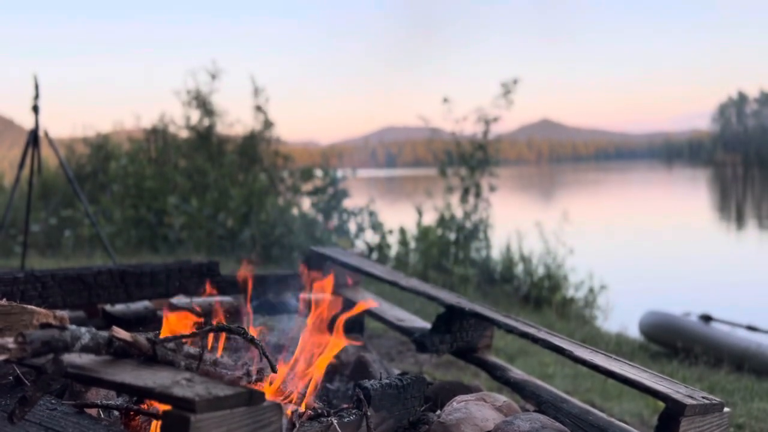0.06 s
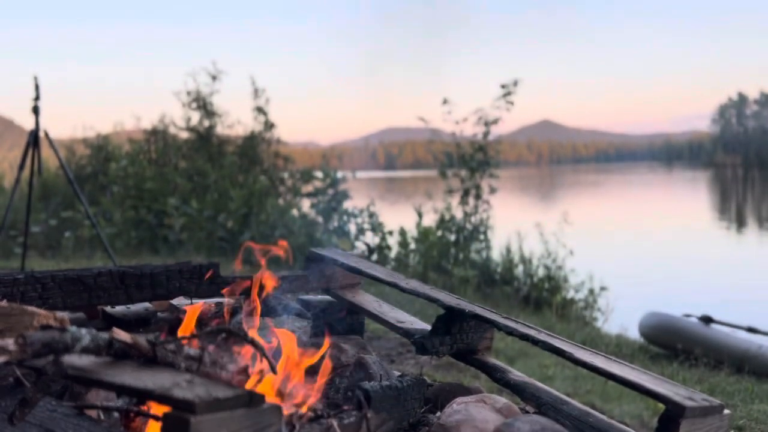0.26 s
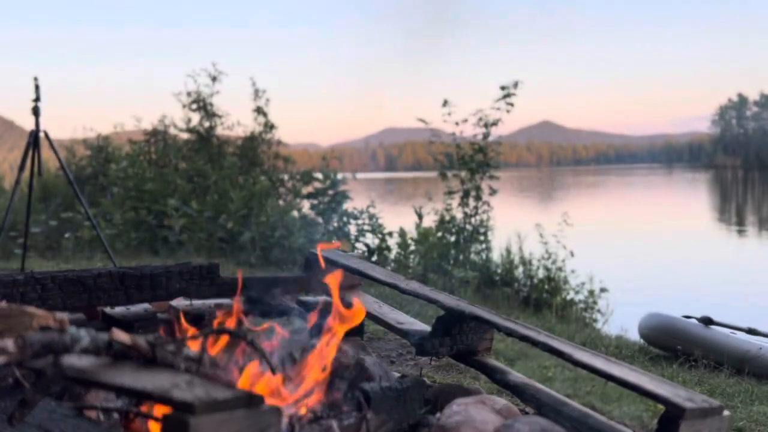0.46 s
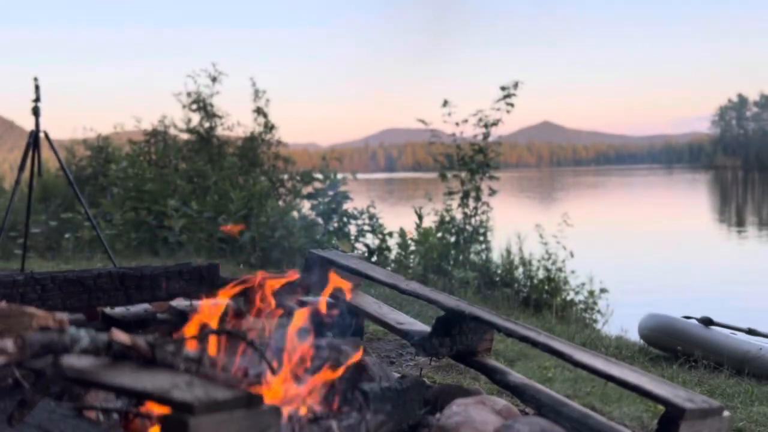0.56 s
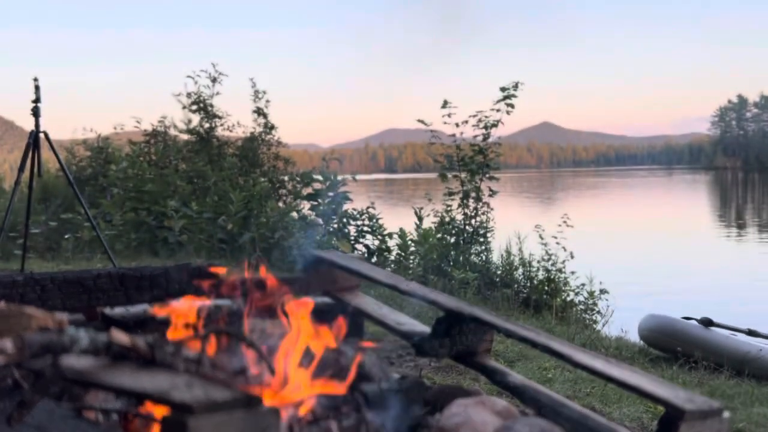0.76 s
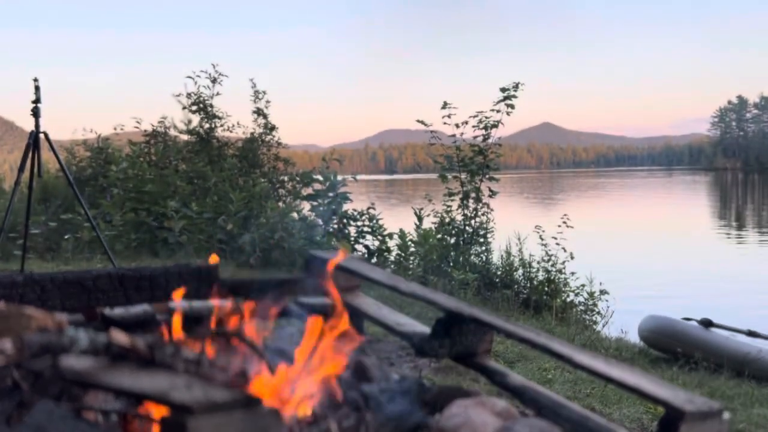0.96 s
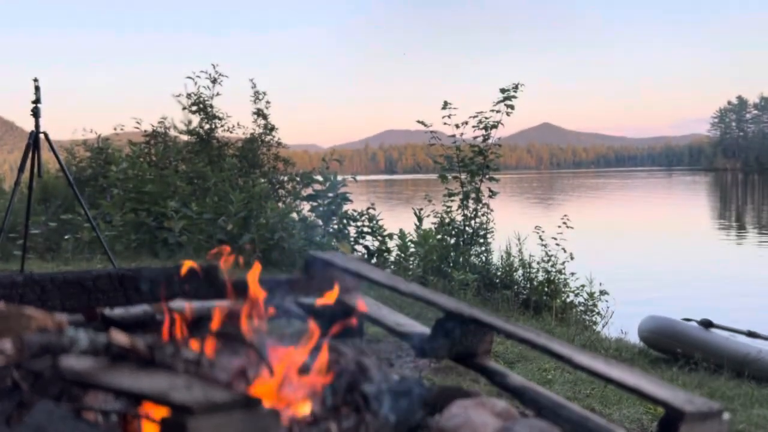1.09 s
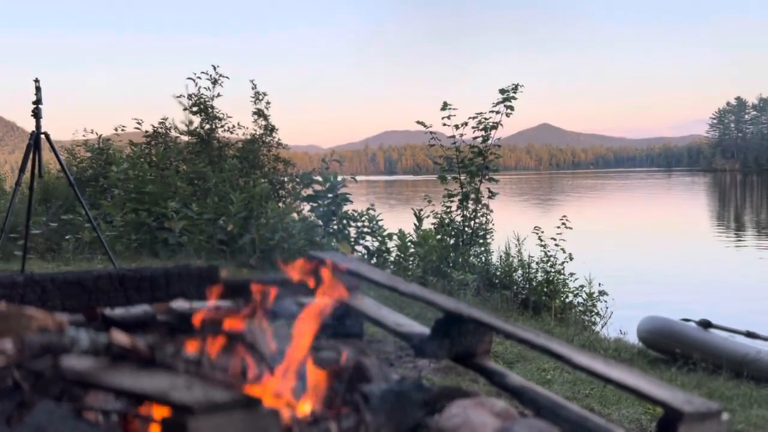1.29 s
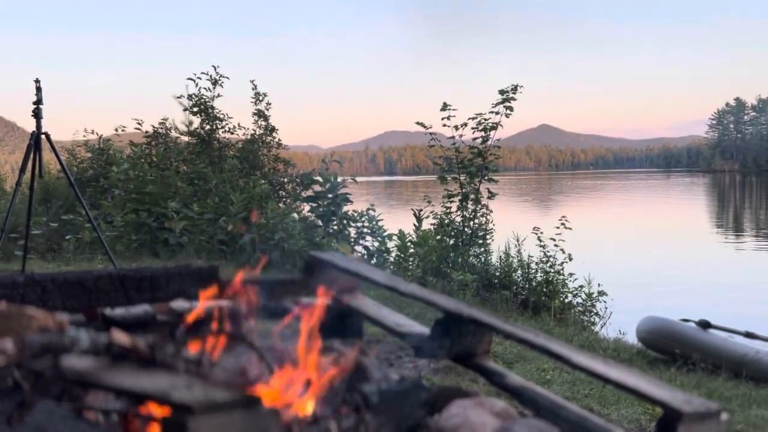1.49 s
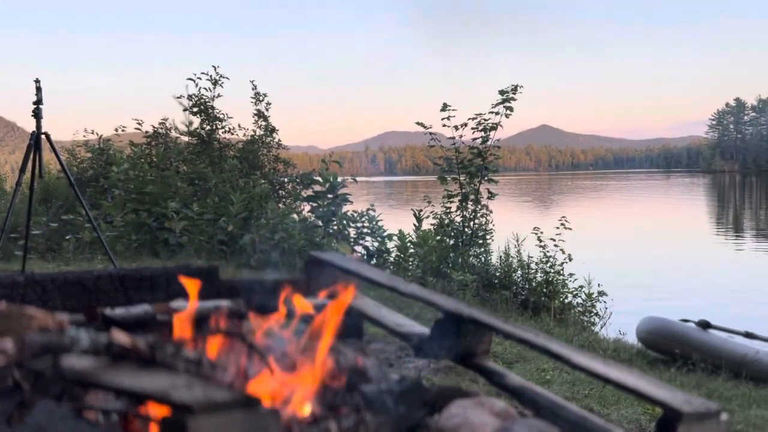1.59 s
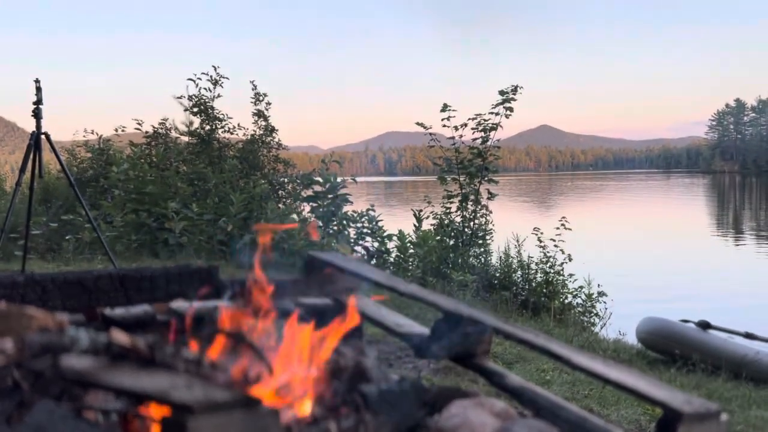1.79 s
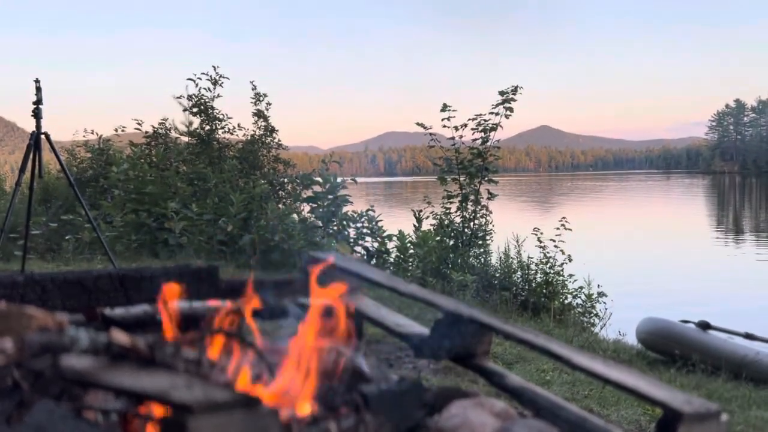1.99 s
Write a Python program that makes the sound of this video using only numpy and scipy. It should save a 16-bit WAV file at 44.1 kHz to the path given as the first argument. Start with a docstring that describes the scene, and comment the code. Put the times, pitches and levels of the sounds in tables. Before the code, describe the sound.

A small wood campfire, close up outdoors, with quiet steady hiss, soft low rumble and tiny ticks. At about 0.2 s a puff of gas flares into a dull, deep thud. Crackles follow from 0.35 to 0.8 s with a narrow steam sizzle. At 0.97 s one loud, bright pop cracks out, its grainy echo fading. Sharp crackles near 1.1 s thin out; a faint puff and very faint high steam whistle come around 1.75 s.

```python
"""Flames rumble softly under a steady hiss and tiny ticks: a small campfire in the open, close to the microphone.
A pocket of gas flares with a dull thud, the logs crackle, and one cracks with a loud pop the trees scatter back.
Steam leaks from the wood in a narrow sizzle, short puffs and a faint high whistle.
Rumble, hiss and puffs are coloured noise; the thud adds low decaying sines, the whistle is a wavering sine.
Crackles and pop are pulses and noise splinters, shaped by the ring of the logs."""
import sys
import numpy as np
from scipy import signal
from scipy.fft import rfft, irfft, next_fast_len
from scipy.io import wavfile
from scipy.ndimage import map_coordinates

SR = 44100
rng = np.random.default_rng(int(sys.argv[2]) if len(sys.argv) > 2 else 0)


def wrap_up_sound(samples):
    """Save the sound to the file named by the first command line argument, as 16-bit audio."""
    columns = np.atleast_2d(samples).T
    # keep every value between -1 and 1, then stretch to whole-number steps
    tamed = np.clip(columns, -1, 1)
    steps = np.round(tamed * 32767).astype(np.int16)
    wavfile.write(sys.argv[1], SR, steps)


N = 90404  # length in samples


def amp(db):
    """Decibels to gain."""
    return 10 ** (np.asarray(db) / 20)


def unit(x):
    """Scaled to rms 1."""
    return x / np.sqrt(np.mean(x ** 2) + 1e-20)


def along(points, hz):
    """Read (f/Hz, value) points on a log frequency axis."""
    f, v = np.transpose(points)
    return np.interp(np.log(hz + 1), np.log(f + 1), v)


def curves(rows):
    """One value per sample for each column after the time."""
    s, *cols = np.transpose(rows)
    return [np.interp(np.arange(N) / SR, s, c) for c in cols]


def wobble(rate):
    """A smooth random curve, rate knots a second."""
    knots = rng.standard_normal(int(N * rate / SR) + 4)
    return map_coordinates(knots, [np.arange(N) * rate / SR])


def fade(t, t60):
    """Exponential decay, 60 dB down after t60 seconds."""
    return np.exp(-np.log(1000) * t / t60)


def swell(start, rise, t60):
    """A rise, then an exponential decay."""
    t = np.arange(N) / SR - start
    return np.clip(t / rise, 0, 1) ** 2 * fade(np.maximum(t - rise, 0), t60)


def filtered(x, response):
    """x times a complex response of frequency."""
    size = x.shape[-1]
    m = next_fast_len(2 * size)
    return irfft(rfft(x, m) * response(np.fft.rfftfreq(m, 1 / SR)), m)[..., :size]


def causal(db):
    """The minimum-phase response with these gains."""
    cepstrum = irfft(np.log(amp(db)))
    half = len(cepstrum) // 2
    return np.exp(rfft(np.r_[cepstrum[0], 2 * cepstrum[1:half], cepstrum[half], np.zeros(half - 1)]))


def resonance(f, hz, width):
    """One causal resonance."""
    return 1j * f * width / (hz * hz - f * f + 1j * f * width)


# how alike left and right are: f/Hz, likeness (1 = mono)
STEREO_LIKENESS = [(60, .94), (250, .87), (640, .42), (1400, 0.0099), (15000, 0)]


def noise(gain):
    """Stereo noise of rms 1, near mono in the bass and wide in the treble."""
    def mid_side_gains(f):
        angle = np.arccos(np.clip(along(STEREO_LIKENESS, f), -1, 1)) / 2
        return gain(f) * np.array([np.cos(angle), np.sin(angle)])

    mid, side = filtered(rng.standard_normal((2, N)), mid_side_gains)
    return unit(np.array([mid + side, mid - side]))


def rush(spectrum):
    """Stereo noise with a (f/Hz, level/dB) colour."""
    return noise(lambda f: amp(along(spectrum, f)))


def add(out, s, x):
    """Mix x into out at time s."""
    i = max(round(s * SR), 0)
    out[:, i:i + x.shape[-1]] += x[:, :max(N - i, 0)]


# colour of the flame rumble: f/Hz, level/dB
RUMBLE_COLOUR = [(20, -22.5), (40, -5), (60, 2.5), (90, 0), (125, -3.5), (170, -5.5), (250, -15),
                 (400, -24), (600, -35.5), (1000, -49.5), (2000, -80.5)]
# course of the rumble: t/s, level/dB
RUMBLE_LEVEL = [(0, -52.5), (.55, -53), (.9, -55.5), (1.25, -57.5), (1.5, -58), (1.7, -57), (2.0, -56)]
# stronger flaps of the flames: t/s, level/dB
FLAPS = [(.565, -49.5), (0.701, -48.5), (1.239, -49.5)]
# colour of the flaps: f/Hz, level/dB
FLAP_COLOUR = [(30, -33), (70, -5.5), (130, 3), (230, -2), (400, -24.5), (900, -57.5)]


def flames():
    """The low, uneven rumble of the flames: wavering bass noise, with a few stronger flaps."""
    level_db, = curves(RUMBLE_LEVEL)
    rumble = amp(level_db + 1.5 * wobble(14)) * rush(RUMBLE_COLOUR)
    flap_level = sum(amp(db) * swell(s, rise=0.005, t60=0.16) for s, db in FLAPS)
    return rumble + flap_level * rush(FLAP_COLOUR)


# colour of the hiss: f/Hz, level/dB
HISS_COLOUR = [(350, -33), (600, -3.5), (758, -1.5), (2950, -6.5), (6730, -5.5), (8740, -9), (10200, -0.5),
               (11800, -2), (14900, -8.5), (16000, -12)]
HISS_DB = -73


def hiss():
    """Steady hiss of the damp wood: coloured noise that barely wavers."""
    return amp(HISS_DB + 0.23 * wobble(36)) * rush(HISS_COLOUR)


TICKS_PER_S, TICK_DB = 30, -75
TICK_SPREAD_DB = 1  # lift for each e-fold drop in the random strength


def embers():
    """Tiny high ticks at random moments: sines that die within milliseconds."""
    out, t = np.zeros((2, N)), np.arange(SR // 100) / SR
    for when, pitch, strength, side in rng.random((int(TICKS_PER_S * N / SR), 4)):
        hz = 4000 + 11000 * np.sqrt(pitch)
        tick = np.sin(2 * np.pi * hz * t) * fade(t, t60=.002)
        level = amp(TICK_DB - TICK_SPREAD_DB * np.log(strength + .01))
        add(out, when * N / SR, level * np.outer([.5 + side, 1.5 - side], tick))
    return out


# puffs, the first already under way at the start: t/s, level/dB, rise t/s, t60 t/s
PUFFS = [(-.06, -56.5, 0.022, 0.2), (0.196, -52, 0.041, 0.6), (1.773, -63.5, 0.024, 0.55)]
# colour of escaping steam, puffs and broad sizzle alike: f/Hz, level/dB
STEAM_COLOUR = [(300, 0), (1000, -2.5), (2500, 0.5), (6000, -3.5), (8500, -8), (11000, -40.5), (16000, -42)]


def puffs():
    """Short puffs of gas: flickering noise that swells and dies away."""
    level = sum(amp(db) * swell(s, rise, t60) for s, db, rise, t60 in PUFFS)
    return level * amp(1.5 * wobble(67.5)) * rush(STEAM_COLOUR)


# course of the sizzle: t/s, level/dB
SIZZLE_LEVEL = [(0, -82), (.15, -123), (.3, -92), (.55, -70), (.78, -69.5), (.93, -77), (1.25, -93)]
SIZZLE_HZ, SIZZLE_WIDTH_HZ = 6040, 650
SIZZLE_BROAD_DB = -1  # broad noise against the narrow band


def sizzle():
    """A jet of steam: a narrow resonant band of noise over a broad one."""
    level_db, = curves(SIZZLE_LEVEL)
    narrow = noise(lambda f: resonance(f, SIZZLE_HZ, SIZZLE_WIDTH_HZ) ** 2)
    jet = narrow + amp(SIZZLE_BROAD_DB) * rush(STEAM_COLOUR)
    return amp(level_db + 1.2 * wobble(37)) * jet


# low resonances of the thud: f/Hz, level/dB, t60 t/s
FLARE_MODES = [(60, -24, .37), (90, -24, .29), (135, -26, .13), (162, -27, .25)]
# colour of the noise in the thud: f/Hz, level/dB
FLARE_BODY = [(20, -9), (35, -36), (60, -15), (130, 5), (260, -1.5), (360, -12.5), (430, -5.5),
              (650, -25.5), (900, -31), (1500, -29.5), (3000, -54)]
FLARE_S, FLARE_RISE_S = .236, 0.012


def flare():
    """Gas catches: a brief flutter of noise, then a dull thud whose deepest part lasts longest."""
    flutter_colour = [(100, -2), (300, 1), (600, 2.5), (900, -1.5), (1300, -19), (4000, -36.5)]
    t = np.maximum(np.arange(N) / SR - FLARE_S, 0)
    boom = sum(amp(db) * np.sin(2 * np.pi * hz * t) * swell(FLARE_S, FLARE_RISE_S, t60)
               for hz, db, t60 in FLARE_MODES)
    body = amp(-27.5) * rush(FLARE_BODY) * swell(0.2277, rise=0.0096, t60=0.39)
    flutter = amp(-37) * rush(flutter_colour) * swell(0.2039, rise=0.028, t60=0.31)
    return boom + body + flutter


RING_CUT_S = .0045


def damped(db):
    """A causal ring with these gains, which the wood stops within a few milliseconds."""
    ring = irfft(causal(db))
    return rfft(ring * np.exp(-(np.arange(len(ring)) / SR / RING_CUT_S) ** 2))


# ring of the logs: f/Hz, width f/Hz, boost level/dB at full ring share
LOGS = [(1098, 220, 11.5), (1887, 180, 8), (2218, 160, 13), (2844, 260, 7.5), (3346, 62, 11),
        (4097, 220, 2.5), (4776, 220, 12), (6330, 170, 13.5), (6490, 300, 7), (11110, 450, 1),
        (13800, 120, 4), (13900, 470, 3.5)]
# colour of splitting wood, with a low thump: f/Hz, level/dB
SPLIT_COLOUR = [(25, -59.5), (55, -29), (80, -5), (115, 11), (250, 13), (420, 11.5), (750, 1.5),
                (1400, -3.5), (3500, -2.5), (6500, -0.5), (8500, -4.5), (12000, -1.5), (15500, -3)]
# echoes off the logs and fire ring: t/s, gain
NEAR_ECHOES = [(.00118, 0.33), (.00165, .3), (.0038, 0.19)]
SPLINTER_T60_S, SPLINTER_DB, SPLINTER_LOW_HZ = .014, -1.5, 1480
OWN_RING_DB, OWN_WIDTH_SHARE = 8.5, 0.27  # each crack's own pitch; width as a share of it
SMALL_RING_SHARE = 0.83  # how much of the logs' ring a small crackle excites
RIGHT_LAG_S = .0001


def crack(treble_db, low_db, pan_db, own_hz, ring_share=SMALL_RING_SHARE, size=2048):
    """Wood splits: a sharp pulse with near echoes and a spray of splinters, coloured by the ring of the logs."""
    t = np.arange(size) / SR
    pulse = np.zeros((2, size))
    pulse[:, 0] = 1
    direct = filtered(pulse, lambda f: 1 + sum(gain * np.exp(-2j * np.pi * f * s) for s, gain in NEAR_ECHOES))
    splinters = unit(rng.standard_normal((2, size)) * fade(t, SPLINTER_T60_S))
    splinters = filtered(splinters, lambda f: (1j * f / (1j * f + SPLINTER_LOW_HZ)) ** 2)  # low cut

    def peak(f, hz, width):
        return np.abs(resonance(f, hz, width)) ** 2

    def ring_db(f):
        logs = sum(db * peak(f, hz, width) for hz, width, db in LOGS)
        return ring_share * logs + OWN_RING_DB * peak(f, own_hz, OWN_WIDTH_SHARE * own_hz)

    tilt = [(1200, low_db), (2800, 0.00085), (8000, 0.00058), (11500, treble_db)]
    x = filtered(unit(direct) + amp(SPLINTER_DB) * splinters,
                 lambda f: causal(along(SPLIT_COLOUR, f) + along(tilt, f)) * damped(ring_db(f)))
    # the right side lags a little, less so in the high treble
    x[1] = filtered(x[1], lambda f: np.exp(-2j * np.pi * f * RIGHT_LAG_S / (1 + (f / 7000) ** 4)))
    return x / np.sqrt(np.sum(x ** 2) / 8) * amp([[pan_db / 2], [-pan_db / 2]])


# crackles: t/s before the split delay, level/dB before the lift, treble level/dB, low band level/dB,
# left over right level/dB, own pitch f/Hz
CRACKLES = [(0.3456, -45.5, -20, 9.5, 0, 980), (0.4075, -46, -30.5, -12.5, 4, 790),
            (0.5551, -32.5, -27.5, -14, -1, 761), (0.603, -44, -24, -14, 3.5, 6900),
            (0.6155, -44, -23.5, -17, -1, 925), (0.6699, -48.5, 5, -2, -3, 5930),
            (0.7093, -32.5, -25.5, -13.5, 0, 800), (0.7563, -48, -20, -10, -1, 867),
            (0.7886, -48, -8.5, -23.5, 1, 6160), (0.8245, -54, -26, -36, 7.5, 5900),
            (1.1069, -33, -18.5, -29, 5, 4560), (1.1548, -41, -19.5, -36, 2.5, 6580),
            (1.1967, -56, -17, -8, 5, 3960), (1.2436, -54.5, 7, -15, -2, 821),
            (1.3902, -64, -12.5, -10, 7.5, 13550), (1.5319, -56, -13, -16.5, 6, 4680),
            (1.6621, -58, -22.5, -14, 0, 14600), (1.9051, -57.5, -25.5, -9, 4.5, 11670),
            (1.946, -59, 5, -14, -4, 13300), (2.0368, -44, -25, -36, 6.5, 4900)]
SPLIT_DELAY_S, CRACKLE_LIFT_DB = 0.00043, 8.5
USUAL_TREBLE_DB, USUAL_LOW_DB = -21, -9.5  # table values that leave the colour of a crack as it is
FORETICK_S, FORETICK_DB = .9395, -42
POP_PAN_DB = 1.5  # left over right, for the pop and the tick before it


def crackles():
    """The small crackles, and a tick just before the pop: quiet cracks of the wood, each with its own colour."""
    out = np.zeros((2, N))
    foretick = crack(treble_db=0.5, low_db=-2, pan_db=POP_PAN_DB, own_hz=7040)
    add(out, FORETICK_S, amp(FORETICK_DB) * foretick)
    for s, db, treble, low, pan, hz in CRACKLES:
        low_db = np.clip(low - USUAL_LOW_DB, -8, 2)
        crackle = crack(treble - USUAL_TREBLE_DB, low_db, pan, hz)
        add(out, s + SPLIT_DELAY_S, amp(db + CRACKLE_LIFT_DB) * crackle)
    return out


# decay of the trees' answer: f/Hz, t60 t/s
TREES_T60 = [(200, 0.14), (1500, 0.46), (5000, 0.47), (8000, .45), (14000, 0.18)]
# its colour: f/Hz, level/dB
TREES_COLOUR = [(100, -6), (400, -4), (1000, -3), (4000, -2), (8000, 1.5), (14000, 1)]
TREES_DB, TREES_RISE_S = -23.5, 0.015
TREES_GRAIN_DB, TREES_GRAINS_PER_S = 2.5, 250


def trees(x):
    """A grainy answer of many small echoes from bushes and trees: x convolved with a decaying noise tail."""
    hz, t, z = signal.stft(rng.standard_normal((2, SR // 2)), SR, nperseg=256)
    decay = fade(t, along(TREES_T60, hz)[:, None])
    colour = amp(along(TREES_COLOUR, hz))[:, None]
    rise = 1 - np.exp(-t / TREES_RISE_S)
    tail = signal.istft(z * decay * colour * rise, SR, nperseg=256)[1]
    tail = tail * amp(TREES_GRAIN_DB * wobble(TREES_GRAINS_PER_S)[:tail.shape[1]])
    return signal.fftconvolve(x, tail / np.linalg.norm(tail[0]), axes=1)[:, :N]


POP_S, POP_DB, POP_TREBLE_DB, POP_HZ = .9684, 3, 3.5, 3720


def pop(ring_share):
    """The one loud pop of a bursting log: a strong, bright crack."""
    out = np.zeros((2, N))
    burst = crack(POP_TREBLE_DB, low_db=1.5, pan_db=POP_PAN_DB, own_hz=POP_HZ, ring_share=ring_share)
    add(out, POP_S, amp(POP_DB) * burst)
    return out


# pitch of the steam whistle: t/s, f/Hz
WHISTLE_PITCH = [(1.5, 11700), (1.68, 11800), (1.70, 12050), (1.75, 11780), (1.85, 11830), (2.05, 11900)]
# its course: t/s, level/dB
WHISTLE_LEVEL = [(1.45, -95), (1.68, -87), (1.74, -79), (1.83, -85), (1.88, -88), (2.05, -85)]


def whistle():
    """A thin steam whistle from the damp wood: a sine of wavering pitch and level."""
    (hz,), (db,) = curves(WHISTLE_PITCH), curves(WHISTLE_LEVEL)
    level = np.sqrt(2) * amp(db + 1.6 * wobble(89))  # the root turns an rms level into a peak
    return level * np.sin(2 * np.pi * np.cumsum(hz + 45 * wobble(300)) / SR)


def scene():
    """The fire, its bed slightly to the left; the trees answer the pop without the ring of the logs."""
    small = crackles()
    steam = hiss() + sizzle() + puffs() + whistle()
    bed = (flames() + flare() + steam + embers()) * amp([[.5], [-.5]])
    near, far = small + pop(ring_share=1), small + pop(ring_share=0)
    return near + amp(TREES_DB) * trees(far) + bed


CEILING = .9  # full scale is 1
NOTCH_HZ, NOTCH_WIDTH_HZ, NOTCH_DB = 10204, 780, -20
TOP_HZ = 16000


def record(dry):
    """The microphone rounds the highest peak, and has a deep notch in the treble and a steep band limit."""
    rounded = dry / (1 + (dry / CEILING) ** 6) ** (1 / 6)
    notched = filtered(rounded, lambda f: causal(NOTCH_DB * np.exp(-((f - NOTCH_HZ) / NOTCH_WIDTH_HZ) ** 2)))
    return filtered(notched, lambda f: 1 / (1 + (f / TOP_HZ) ** 120))


dry = scene()
out = record(dry)
wrap_up_sound(out)
```